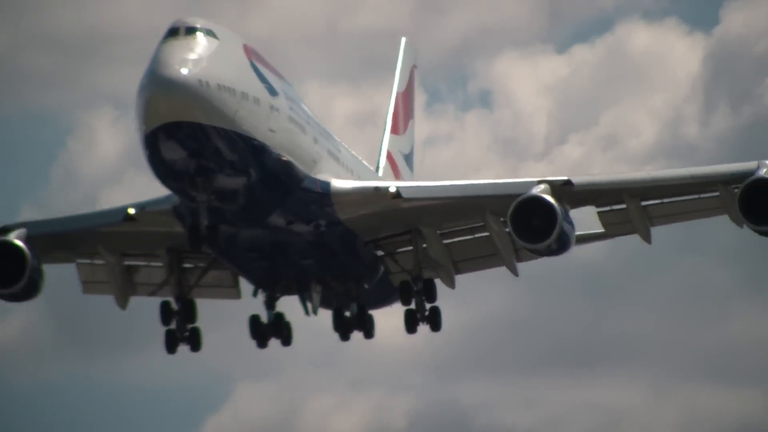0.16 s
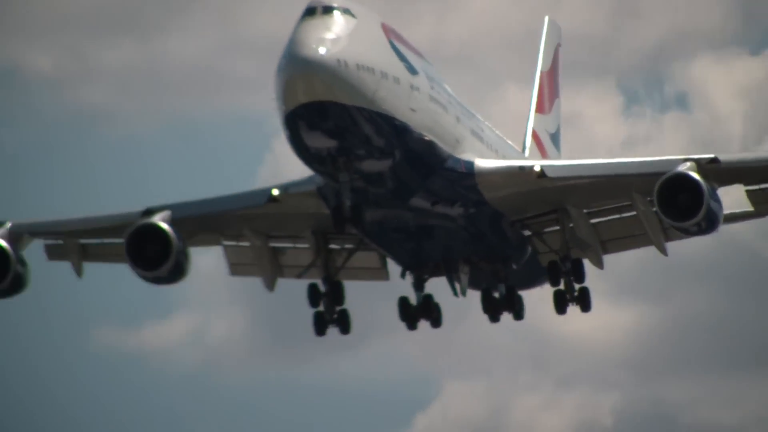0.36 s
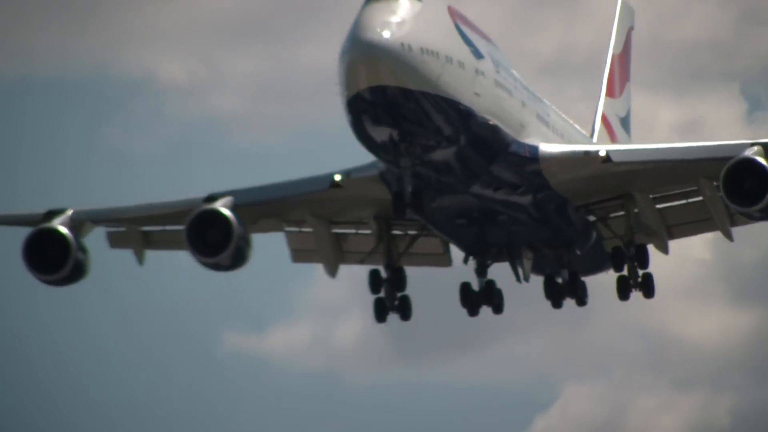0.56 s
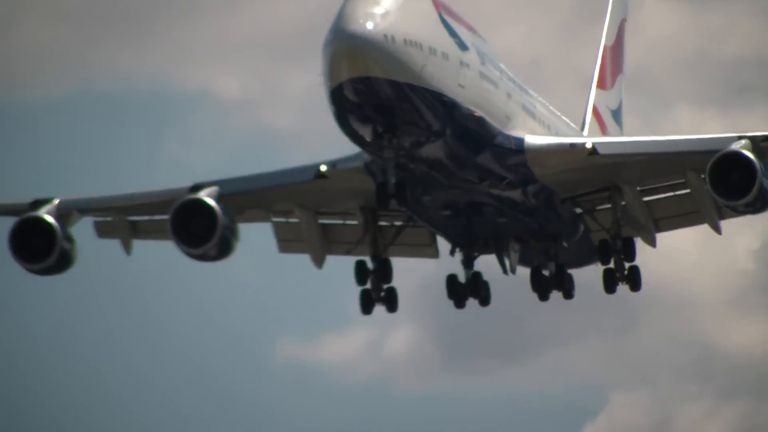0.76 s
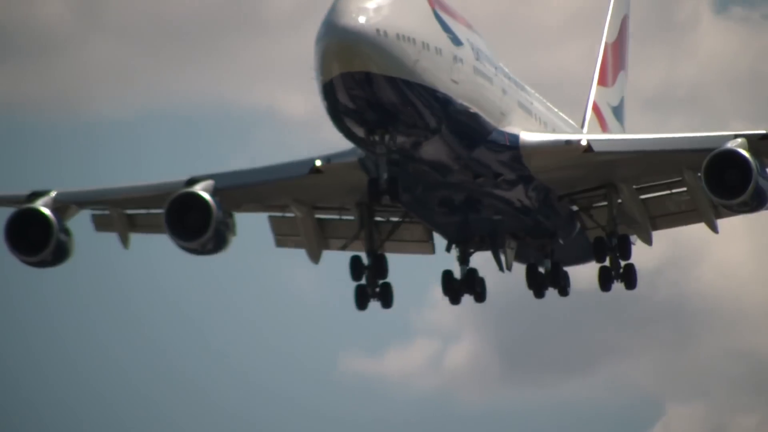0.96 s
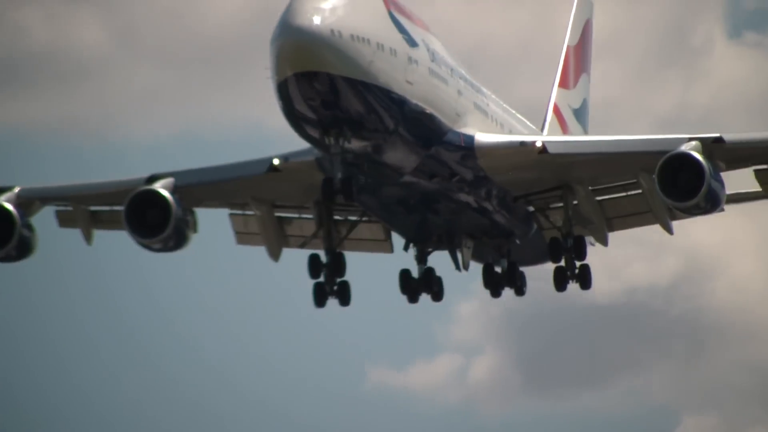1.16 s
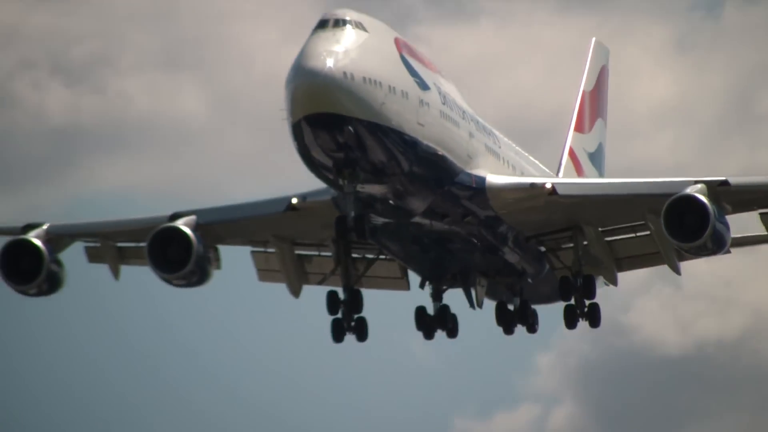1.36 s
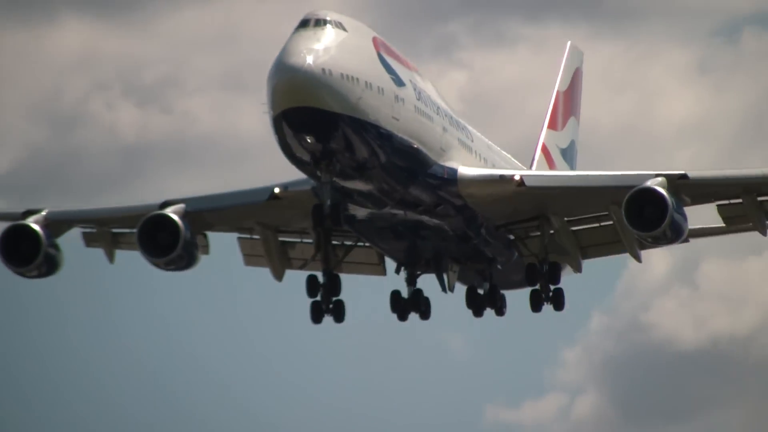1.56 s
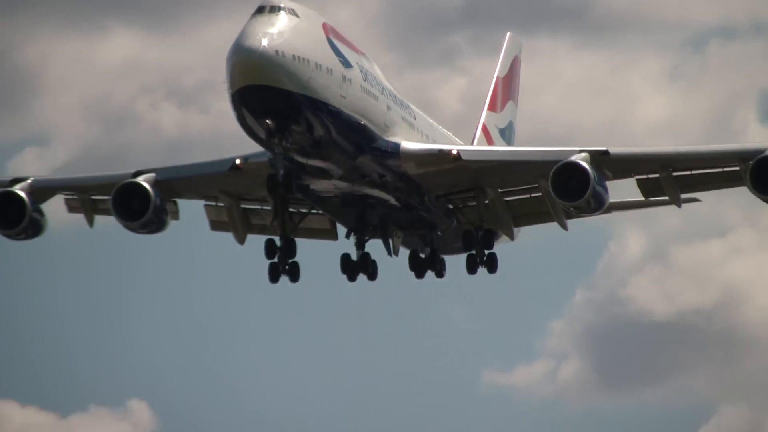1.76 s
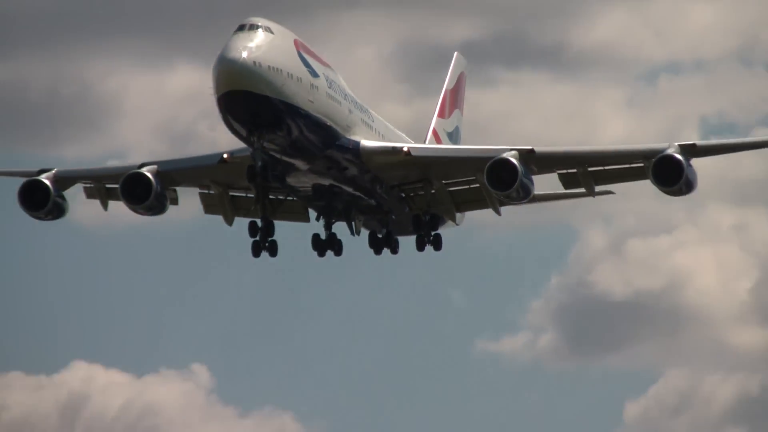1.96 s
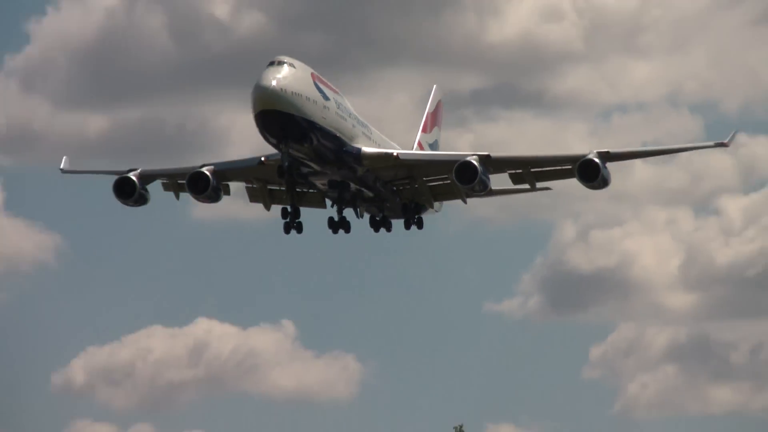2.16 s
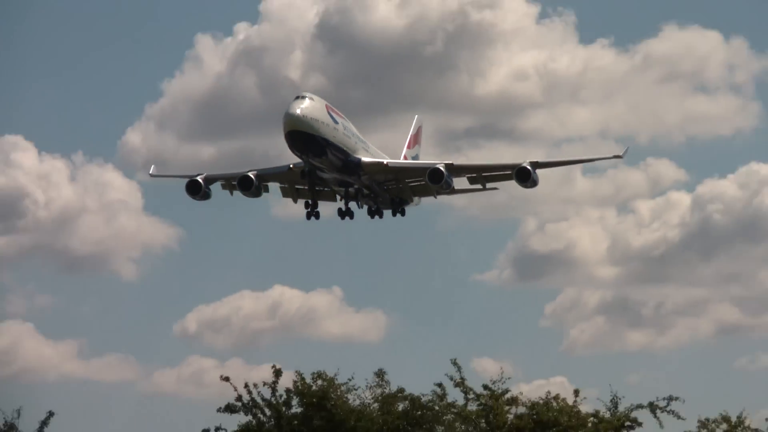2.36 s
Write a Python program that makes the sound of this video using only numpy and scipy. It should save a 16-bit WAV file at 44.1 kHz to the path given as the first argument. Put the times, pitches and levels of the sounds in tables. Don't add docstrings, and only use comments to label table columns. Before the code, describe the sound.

A large jet airliner roars on approach, broad and slightly left, with a faint fan whine. Outdoors, deep wind rumble and fluttering gusts batter the stereo microphone, hardest around one second, with overload ticks.

```python
import sys
import numpy as np
from scipy import signal
from scipy.fft import rfft, irfft, next_fast_len
from scipy.io import wavfile
from scipy.ndimage import uniform_filter1d, map_coordinates

SR = 44100
rng = np.random.default_rng(int(sys.argv[2]) if len(sys.argv) > 2 else 0)


def decibels_to_gain(level_db):
    exponent = np.asarray(level_db, float) / 20
    return 10 ** exponent


def put_to_file(sound):
    columns = np.atleast_2d(sound).T
    safe = np.clip(columns, -1, 1)
    whole_steps = np.round(safe * 32767)
    wavfile.write(sys.argv[1], SR, whole_steps.astype(np.int16))


N = 111573
SIDES = np.array([[1], [-1]])

# [t/s, level/dB, clearness of the
# treble/dB]
JET_COURSE = [(0, -28, 1.5), (.15, -26, -3.5), (.29, -23, -2), (.45, -25, -3), (.65, -24.5, -3.5),
              (.8, -25, -3), (.9, -29.5, 0), (1.05, -25, -3.5), (1.11, -26.5, -2), (1.2, -28.5, -3),
              (1.34, -32, -4.5), (1.55, -28, -5.5), (1.85, -30.5, -2.5), (2.05, -29, -7), (2.22, -33.5, -3),
              (2.3, -30.5, -2.5), (2.4, -31.5, -4), (2.53, -28.5, -9)]
# [f/Hz, level per Hz/dB]
ROAR_SPECTRUM = [(90, -10.5), (280, 0), (450, -3), (1100, -1), (2100, -13.5), (3300, -21.5), (6000, -27),
                 (10500, -47)]
# [f/Hz, likeness 0 to 1]
ROAR_LIKENESS = [(300, 1), (1000, 0.95), (3000, 0.85), (6000, 0.22), (10000, .1)]
# [t/s, level/dB, lean to the left port/dB]
WIND_COURSE = [(0.03, -9.5, 6.5), (0.13, -11.5, -1.5), (0.21, -19, 3), (0.24, -13.5, 0), (0.32, -10.5, 3.5),
               (0.68, -12, 3), (0.92, -2.5, -5), (0.96, -16.5, 8), (1.08, -8.5, -25), (1.12, -10, 55),
               (1.21, -5, -9.5), (1.31, -11.5, 7.5), (1.38, -12.5, -9.5), (1.41, -17.5, 5),
               (1.55, -10.5, 7), (2.29, -7, 0), (2.4, -10.5, 5), (2.5, -7, -6.5)]
# [f/Hz, level per Hz/dB]
RUMBLE_SPECTRUM = [(4.7, -43), (8.0, -6), (22, 3.5), (44, -1), (117, -12), (238, -20.5), (354, -41.5),
                   (500, -36), (650, -38), (1100, -120)]
# [f/Hz, likeness 0 to 1]
RUMBLE_LIKENESS = [(20, 0.99), (60, 0.6), (150, 0.31), (400, 0.22)]
# [t/s, peak level/dB]
LEFT_GAIN_TICKS = [(0.0137, -33), (0.0247, -32), (0.0704, -36.0), (0.2012, -48), (0.2054, -47),
                   (0.3337, -39), (0.3529, -44.0), (0.3684, -39), (0.3842, -52), (0.3937, -38),
                   (0.5113, -38), (0.5757, -48), (0.5789, -42.0), (0.6854, -40.0), (0.7506, -45.0),
                   (0.7839, -39.5), (0.8176, -42), (0.8413, -41), (0.8944, -43), (1.0489, -38.0),
                   (1.1537, -36.5), (1.2087, -39), (1.2169, -48), (1.2441, -36.5), (1.2822, -36),
                   (1.3032, -44), (1.3291, -38), (1.4467, -43), (1.5094, -40.0), (1.5563, -39.5),
                   (1.6297, -41), (1.6836, -41.0), (1.7147, -42.5), (1.7798, -36), (1.8229, -39),
                   (1.8644, -42), (1.9771, -39.0), (2.0366, -40.0), (2.0913, -39.0), (2.126, -40),
                   (2.1573, -40), (2.2133, -40), (2.3019, -39.0), (2.4945, -41), (2.5155, -37.5)]
# [t/s, peak level/dB]
RIGHT_GAIN_TICKS = [(0.2281, -53.0), (0.3366, -54), (0.3703, -41.0), (0.3933, -39), (0.6896, -48),
                    (0.6945, -48), (0.699, -52.0), (0.749, -54), (0.7562, -55), (0.8211, -36),
                    (0.8435, -38.5), (0.8521, -52), (0.867, -37), (0.8764, -43.0), (0.8817, -52),
                    (0.8938, -39), (0.898, -47.0), (0.9153, -35.5), (1.0754, -46), (1.1445, -38),
                    (1.1583, -50), (1.1793, -43), (1.1823, -55), (1.1991, -44), (1.207, -35), (1.2163, -55),
                    (1.362, -53), (1.3702, -35), (1.4866, -51.0), (1.4994, -53), (1.5683, -42),
                    (1.6401, -47.0), (1.6871, -41), (1.797, -41.0), (1.8684, -39.0), (1.8749, -50),
                    (2.0493, -38), (2.0577, -51), (2.0868, -38), (2.099, -51.0), (2.1229, -49),
                    (2.129, -39), (2.1351, -51), (2.1597, -41), (2.504, -44.0)]
# [t/s, level/dB, length/s, lean to the left port/dB]
GUST_EVENTS = [(0.038, -27.5, 0.013, 16.5), (0.283, -33, 0.12, 32), (0.48, -35, 0.035, 0),
               (0.847, -13.5, 0.025, 4), (.875, -10, 0.021, -16), (0.909, -22, 0.016, 2),
               (1.042, -19, 0.019, -2), (1.081, -19.5, 0.022, -14), (1.159, -14, 0.025, -11),
               (1.198, -2, 0.0095, 2), (1.252, -17, 0.015, 14.5), (1.296, -14, 0.024, 10.5),
               (1.52, -20.5, .04, -5), (1.696, -28, 0.029, -1), (1.802, -18, 0.018, 9.5),
               (1.835, -30, 0.014, 16), (1.919, -23, 0.0084, 12), (2.041, -19, 0.013, -2),
               (2.072, -14, 0.021, -6), (2.112, -21.5, 0.038, 7.5), (2.208, -28.5, 0.0099, 10),
               (2.304, -28.5, 0.074, 4), (2.523, -16.5, 0.029, 14.5)]
# [f/Hz, level per Hz/dB]
FLUTTER_SPECTRUM = [(50, -3), (120, -0.5), (250, -3.5), (500, -18), (750, -25), (1500, -34), (3000, -120)]
# [t/s, level/dB, length/s, lean to the left port/dB]
WHIP_EVENTS = [
    (.872, -23, 0.012, -13),
    (1.207, -23, 0.011, -6),
    (1.252, -13.5, 0.0084, 13),
    (2.07, -30.5, 0.024, -3),
]
# [f/Hz, level per Hz/dB]
WHIP_SPECTRUM = [(200, -22), (350, -3.5), (500, -3.5), (680, -9), (900, -26), (2000, -120)]


def unit(x):
    return x / np.sqrt(np.mean(x ** 2) + 1e-20)


def along(points, hz):
    f, value = np.transpose(points)
    return np.interp(np.log(hz + 1), np.log(f + 1), value)


def curves(rows):
    s, *columns = np.transpose(rows)
    return [np.interp(np.arange(N) / SR, s, column) for column in columns]


def wobble(rate):
    return map_coordinates(rng.standard_normal(400), [np.arange(N) * rate / SR])


def filtered(x, response):
    m = next_fast_len(N + SR // 2)
    return irfft(rfft(x, m) * response(np.fft.rfftfreq(m, 1 / SR)), m)[..., :N]


def rush(spectrum, alike, patchy_db):
    grains = signal.stft(rng.standard_normal((2, N)), nperseg=512)[2]
    patches = uniform_filter1d(rng.standard_normal(grains.shape[1:]), size=8, axis=0)
    patches = uniform_filter1d(patches, size=12, axis=1)
    pair = signal.istft(grains * decibels_to_gain(patchy_db * unit(patches)), nperseg=512)[1][:, :N]

    def shape(hz):
        angle = np.arccos(np.clip(along(alike, hz), -1, 1)) / 2
        return decibels_to_gain(along(spectrum, hz)) * [np.cos(angle), np.sin(angle)]

    mid, side = filtered(pair, shape)
    return unit(np.array([mid + side, mid - side]))


def jets():
    turbine_hz, split_hz, haze_hz = 2010, 3360, 4600
    whine_hz, whine_width_hz = 2274, 49
    echo_s, lead_rad = 0.00104, 0.12
    level_db, clear_db = curves(JET_COURSE)
    t = np.arange(N) / SR

    roar = rush(ROAR_SPECTRUM, ROAR_LIKENESS, patchy_db=1.3)
    body = filtered(roar, lambda hz: 1 / (1 + (hz / turbine_hz) ** 4))
    upper = filtered(roar, lambda hz: 1 / (1 + (hz / split_hz) ** 4))
    nearing = decibels_to_gain(4.5 * t)
    clearness = decibels_to_gain(clear_db + 0.74 * wobble(4.73))
    roar = body + (upper - body) * nearing + (roar - upper) * clearness
    fizz = filtered(roar, lambda hz: 1 / (1 + (haze_hz / (hz + 1)) ** 6))
    roar = roar + fizz * (decibels_to_gain(-1.5 * t) - 1)

    whine = rng.standard_normal(N)
    whine = unit(filtered(whine, lambda hz: 1 / (1 + ((hz - whine_hz) / whine_width_hz) ** 2)))
    direct = roar + decibels_to_gain(-31 + 7.5 * t) * whine

    late = filtered(direct, lambda hz: np.exp(-2j * np.pi * hz * echo_s) / (1 + (hz / 3500) ** 2))
    both = direct + (0.019 + 0.0088 * t) * late
    both = filtered(both, lambda hz: np.exp(0.5j * lead_rad * SIDES) + 0 * hz)
    return both * decibels_to_gain(level_db + 2 + 0.25 * wobble(10.9) + 4 / 2 * SIDES)


def wind():
    lag_s, level_db, left_db, most_lean_db = 0.0017, 0.72, 0.7, 8
    strength_db, lean_db = curves(WIND_COURSE)
    eddies = rush(RUMBLE_SPECTRUM, RUMBLE_LIKENESS, patchy_db=-1.2)
    eddies[1] = np.roll(eddies[1], round(lag_s * SR))
    lumps = decibels_to_gain(1.17 * np.array([wobble(10.46), wobble(20)]))
    lean_db = left_db + np.clip(lean_db, -most_lean_db, most_lean_db)
    return unit(eddies * lumps) * decibels_to_gain(strength_db + level_db + lean_db / 2 * SIDES)


def ticks():
    tick_db, tick_hz, tick_low_hz = 21, 2500, 1500
    crackles, crackle_db, crackle_left_db = 160, -46, 3
    out = np.zeros((2, N))
    for port, table in enumerate((LEFT_GAIN_TICKS, RIGHT_GAIN_TICKS)):
        s, db = np.transpose(table)
        up_or_down = np.sign(rng.standard_normal(len(s)))
        out[port, np.round(s * SR).astype(int)] = decibels_to_gain(db + tick_db) * up_or_down

    when = (rng.random((2, crackles)) * N).astype(int)
    size_db = -2 * rng.standard_normal((2, crackles))
    swell_db = 1.3 * curves(WIND_COURSE)[0][when]
    out[[[0], [1]], when] += decibels_to_gain(crackle_db + swell_db + size_db + crackle_left_db / 2 * SIDES)

    def click(hz):
        fade = SR / (2 * np.pi) / (tick_hz + 1j * hz)
        return fade * 1j * hz / (tick_low_hz + 1j * hz)

    return filtered(out, click)


def swell(events):
    t = np.arange(N) / SR
    return sum(decibels_to_gain(db + lean_db / 2 * SIDES) * np.exp(-((t - s) / length_s) ** 2)
               for s, db, length_s, lean_db in events)


def gusts():
    lumps = decibels_to_gain(2.46 * np.array([wobble(60), wobble(60)]))
    flutter = unit(lumps * rush(FLUTTER_SPECTRUM, [(100, 0.68)], patchy_db=0.1))
    whips = rush(WHIP_SPECTRUM, [(100, 0.25)], patchy_db=-3.5)
    return swell(GUST_EVENTS) * flutter + swell(WHIP_EVENTS) * whips


def soft_limit(x, top, knee):
    return x / (1 + np.abs(x / top) ** knee) ** (1 / knee)


def scene():
    return jets() + soft_limit(wind() + gusts(), top=1.0, knee=6)


def top_cut(x):
    return signal.sosfilt(signal.butter(12, 15900, fs=SR, output="sos"), x)


def record(dry):
    coupling_hz, whine_hz, top_hz = 1.6, 12207, 14800
    t = np.arange(N) / SR
    x = soft_limit(decibels_to_gain(0.6) * dry, top=1.12, knee=20)
    x = filtered(x, lambda hz: 1j * hz / (coupling_hz + 1j * hz))
    x = x + ticks()
    x = x + decibels_to_gain(-66 + 1.5 * SIDES) * rng.standard_normal(dry.shape)
    x = x + decibels_to_gain(-79) * np.sin(2 * np.pi * whine_hz * t)
    x = filtered(x, lambda hz: 1 / (1 + (hz / top_hz) ** 30))
    return top_cut(x)


dry = scene()
out = record(dry)
put_to_file(out)
```